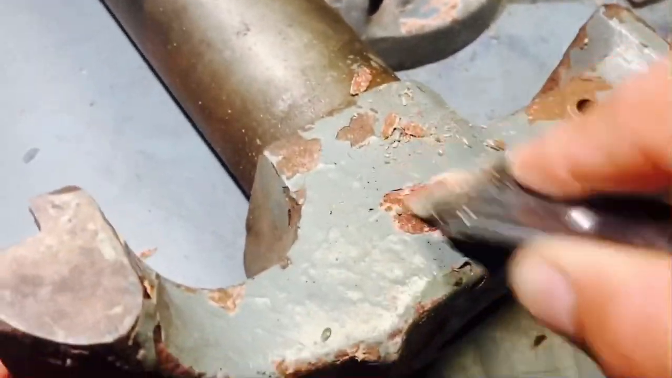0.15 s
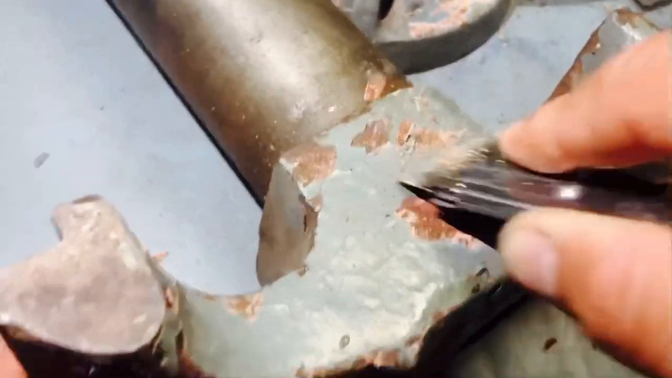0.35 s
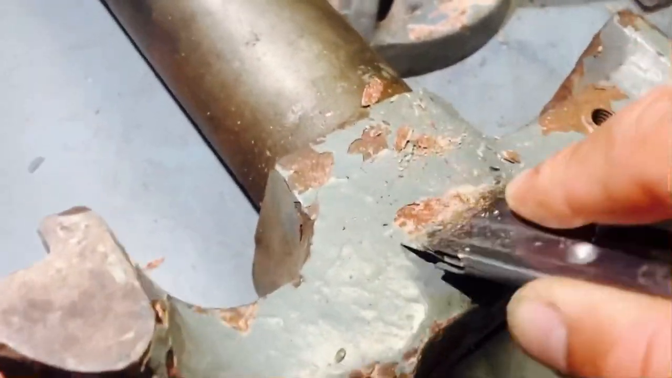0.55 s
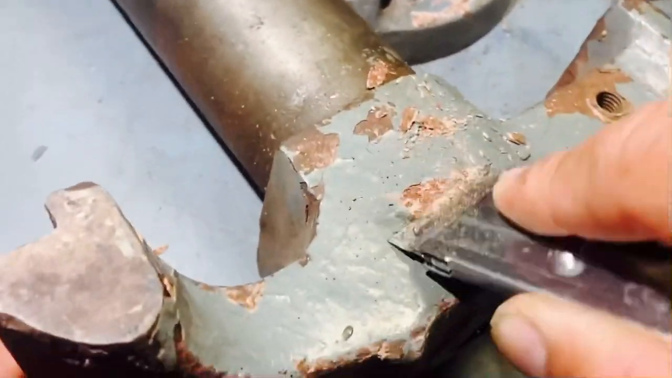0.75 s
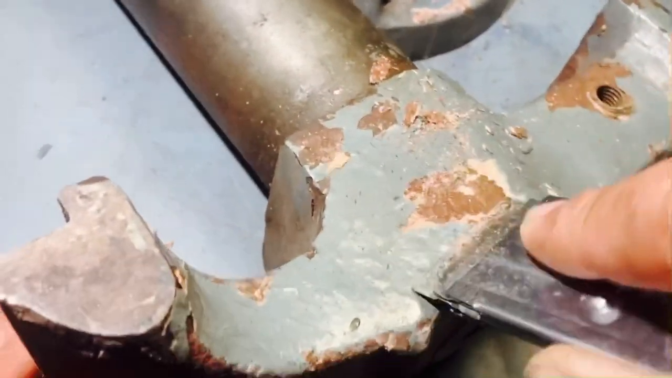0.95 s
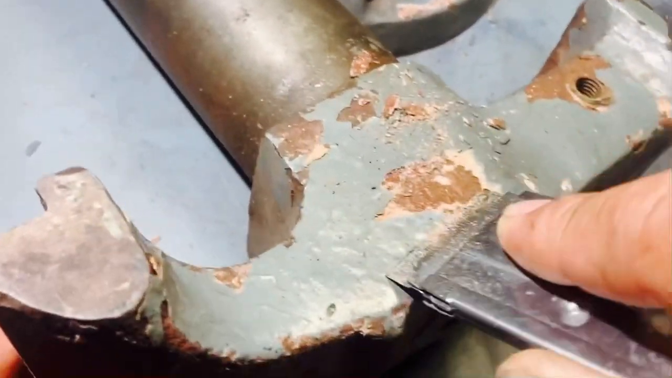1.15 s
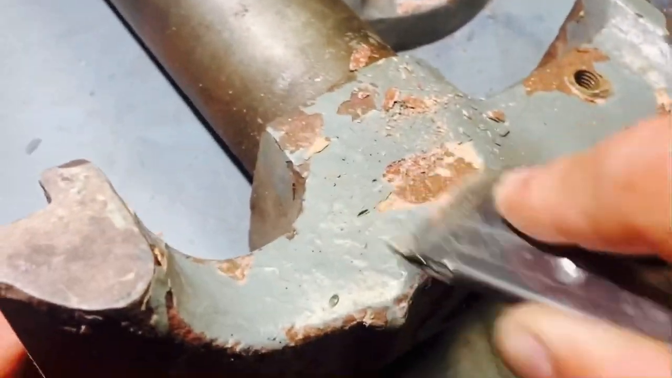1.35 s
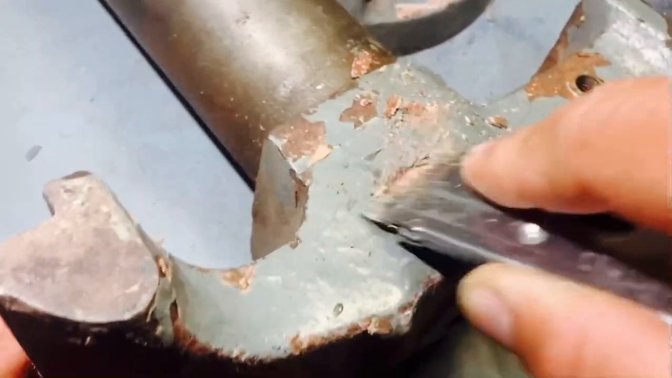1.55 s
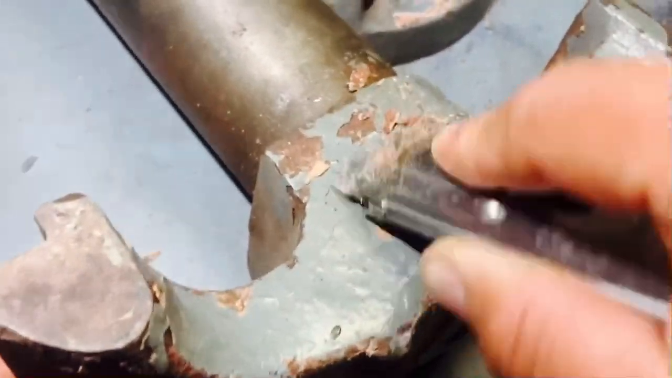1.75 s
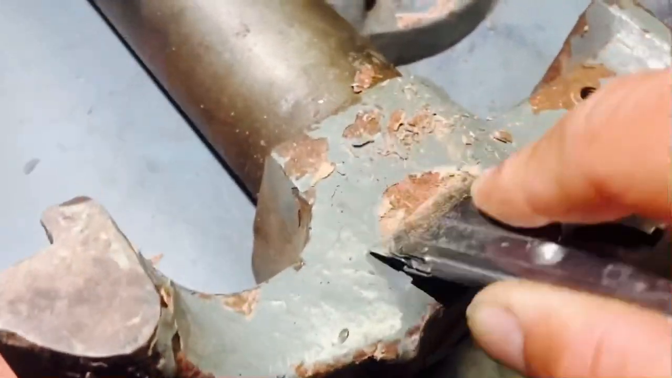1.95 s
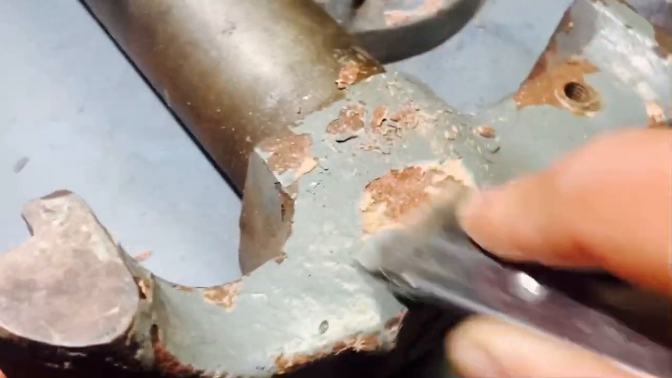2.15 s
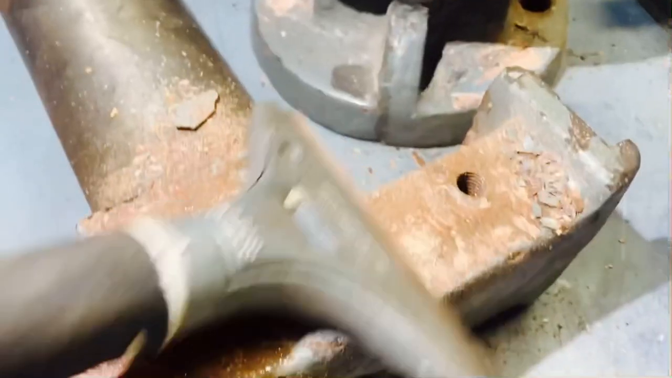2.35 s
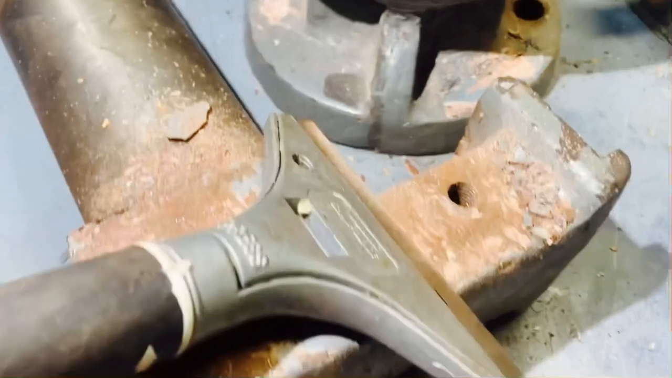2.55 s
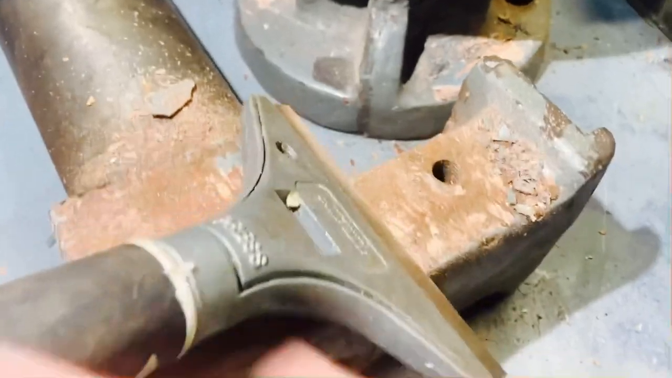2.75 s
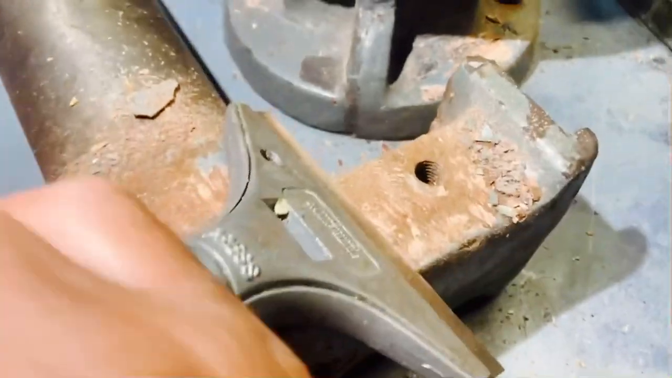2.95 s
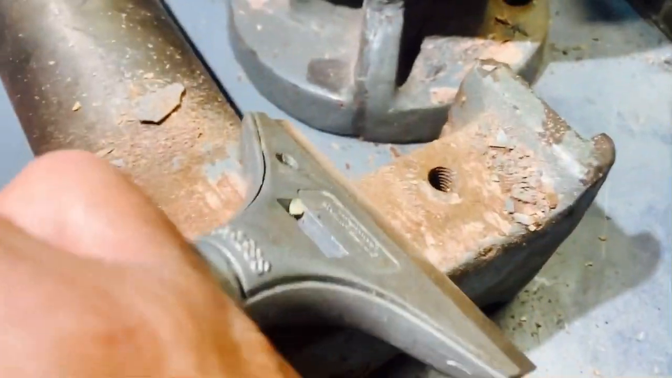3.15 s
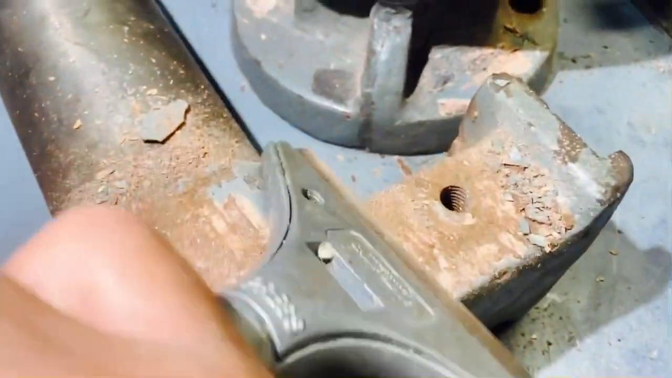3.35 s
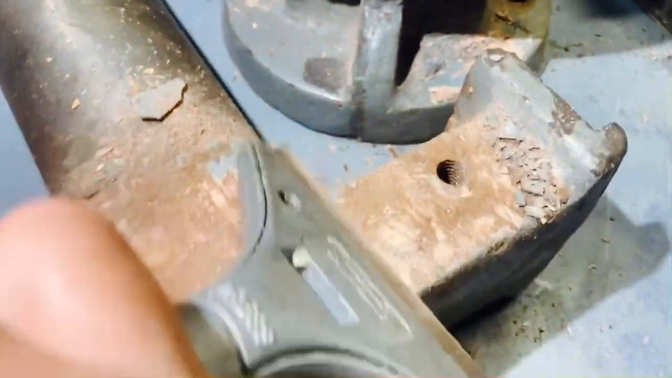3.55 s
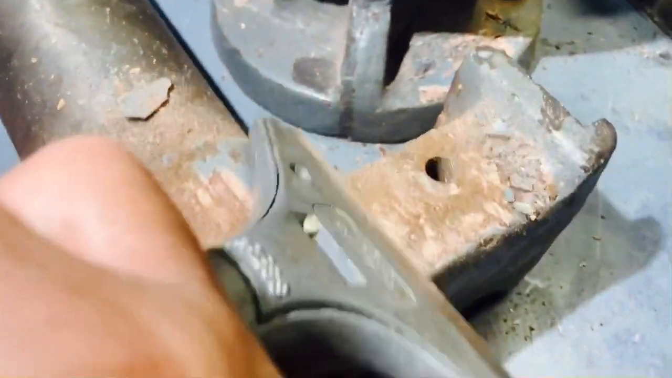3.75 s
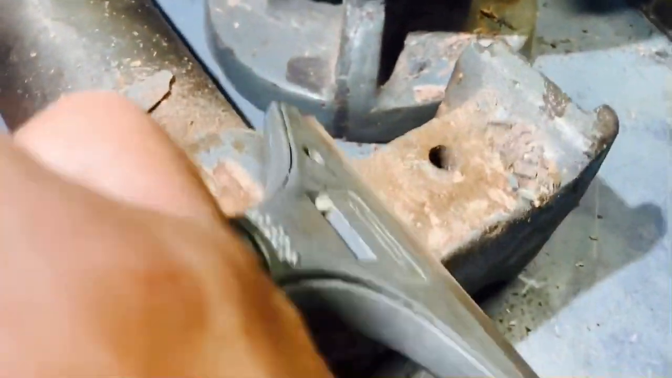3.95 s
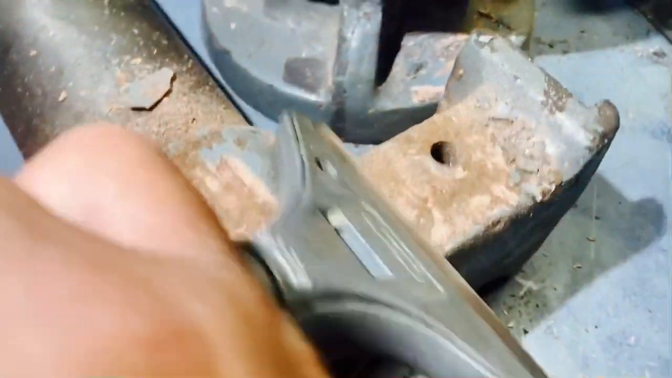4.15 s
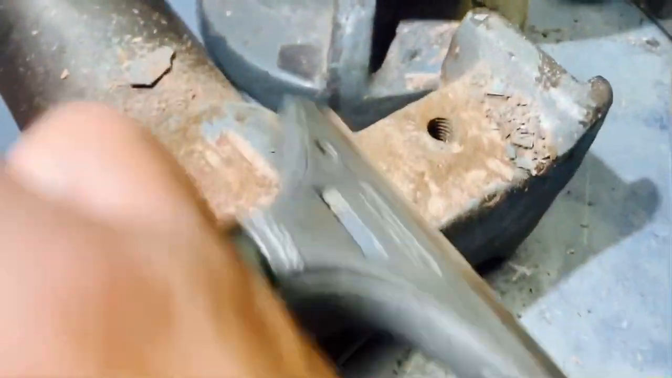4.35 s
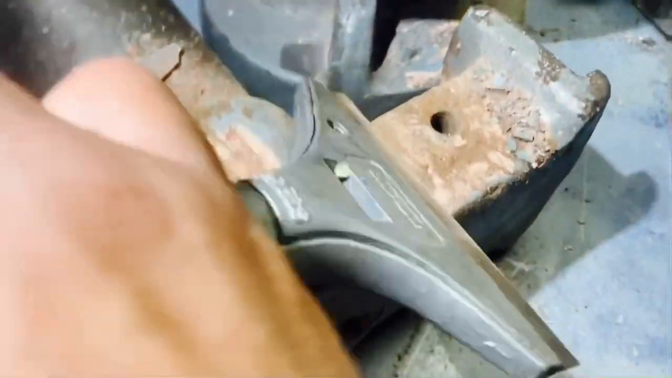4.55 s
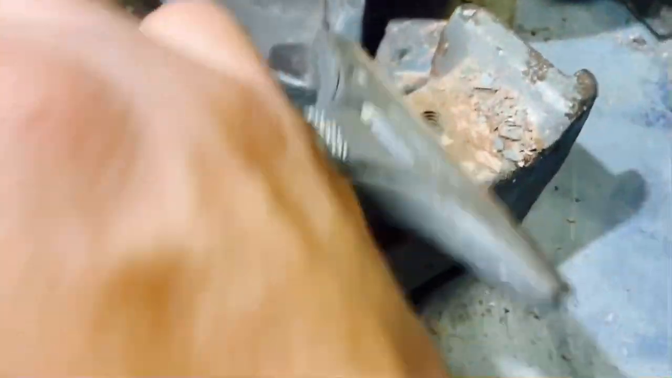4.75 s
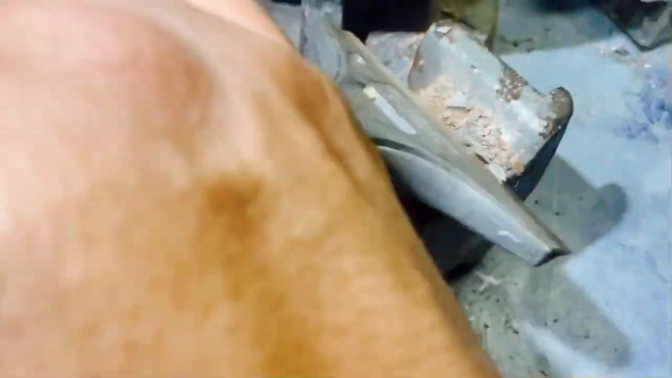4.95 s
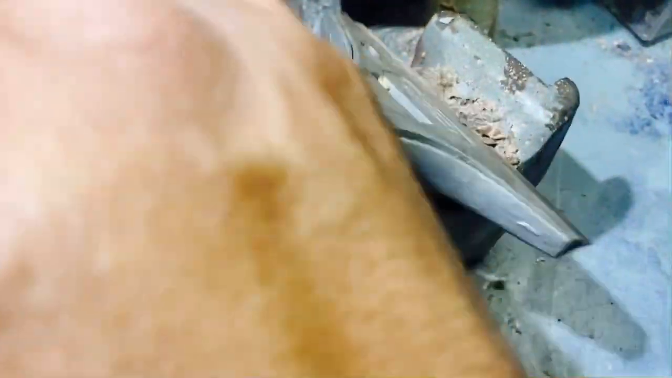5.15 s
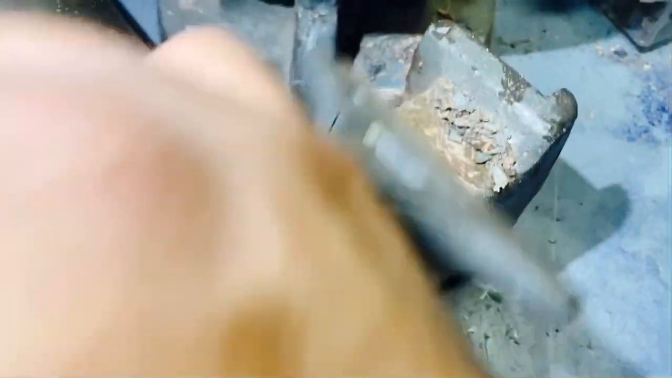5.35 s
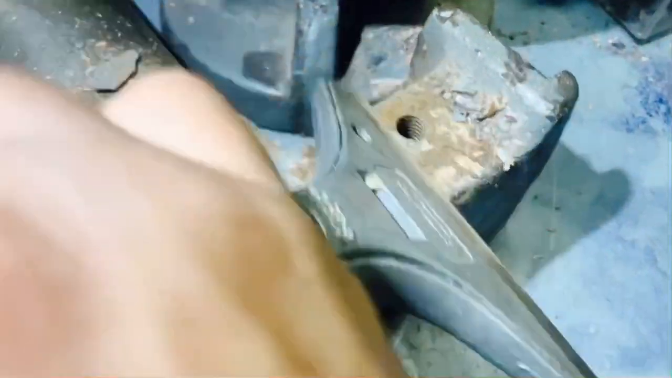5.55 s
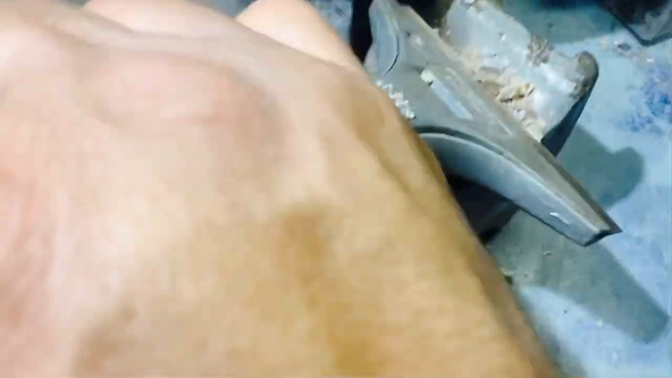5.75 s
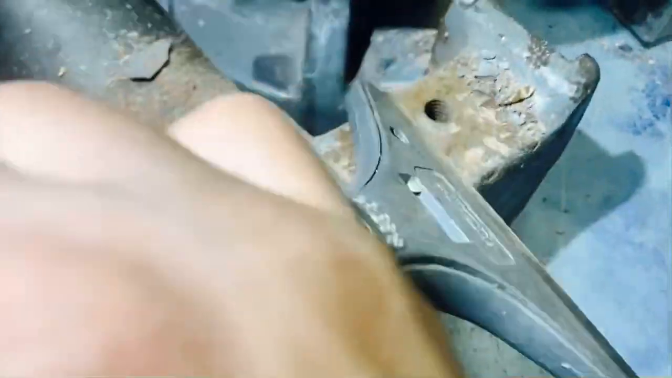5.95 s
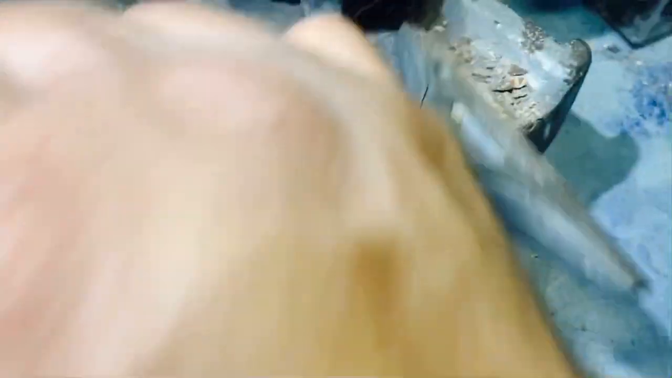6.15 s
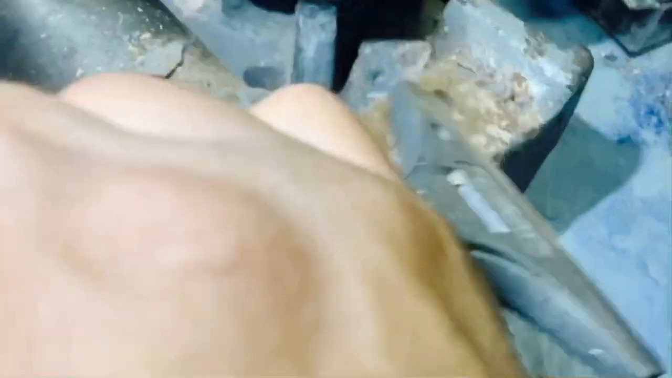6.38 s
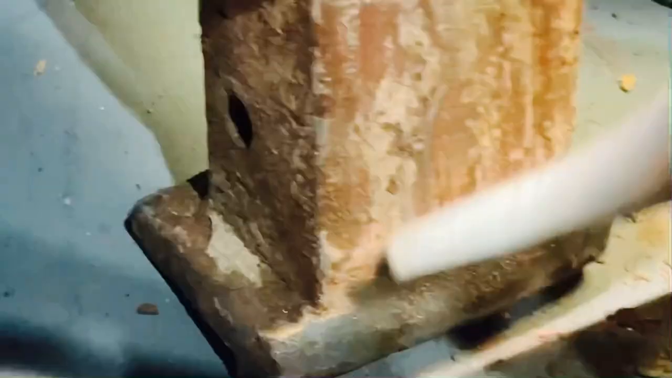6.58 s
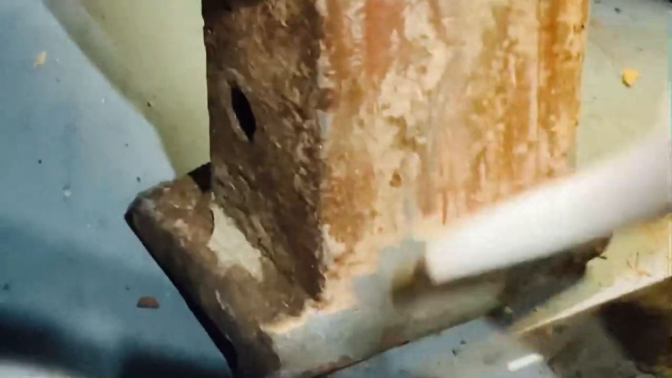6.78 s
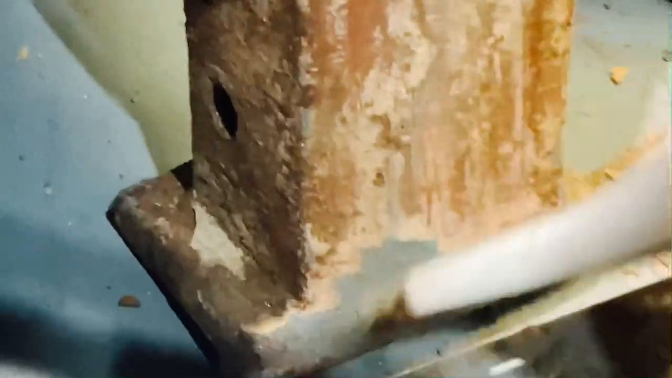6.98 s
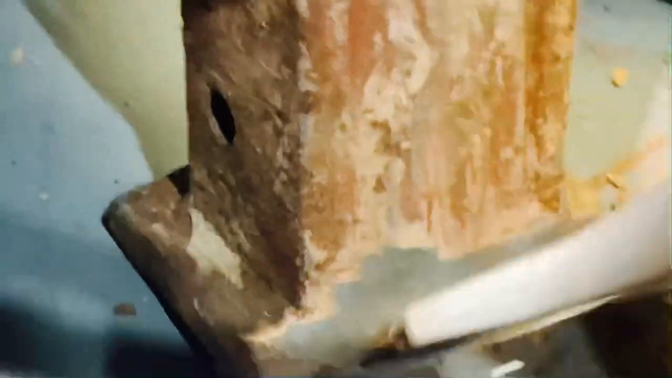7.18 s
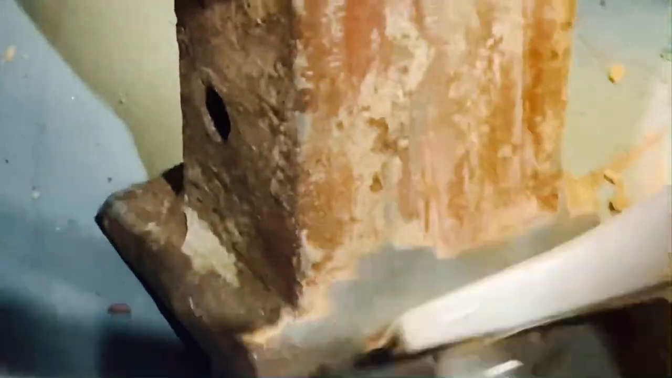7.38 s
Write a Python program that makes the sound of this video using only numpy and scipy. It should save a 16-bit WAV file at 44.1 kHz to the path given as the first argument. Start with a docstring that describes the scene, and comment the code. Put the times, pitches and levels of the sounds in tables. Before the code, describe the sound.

Quick dry scraping of rust and flaking paint off a heavy iron vise, brittle flakes snapping, then thudding knocks and a faint metallic singing.

```python
"""Rust and flaking paint are scraped off a cast-iron vise in quick strokes, heard close by in stereo.
A knife works first, then a wide scraper, later leant over, and last a rod on the upturned jaw.
Throughout, grit excites the resonances of each tool, and snapping flakes add short noise bursts.
Knocks and shaking ring the decaying modes of vise and bench, and a buzz follows each knock; from midway until
near the end the jaw sings in narrow resonances. A short diffuse tail and a workshop's noise hum lie behind."""
import sys
import numpy as np
from scipy import signal
from scipy.fft import rfft, irfft
from scipy.io import wavfile
from scipy.ndimage import uniform_filter1d

SR = 44100
rng = np.random.default_rng(int(sys.argv[2]) if len(sys.argv) > 2 else 0)


def waveform_to_disk(signal):
    """Save audio, clipped to [-1, 1], as 16-bit WAV at the path in sys.argv[1]."""
    frames = np.transpose(np.atleast_2d(signal))
    scaled = np.clip(frames, -1, 1) * 32767
    samples = np.round(scaled).astype(np.int16)
    wavfile.write(sys.argv[1], SR, samples)


N = 327222

# All levels are relative to the stage they feed.
# Strokes of the edge: bite t/s, swell/ms, ease/ms, hardest level/dB, treble over middle/dB
STROKES = [(0.0, 3.4, 14.5, -21.5, 6), (0.107, 45, 11, -27.5, 13), (0.182, 33, 27.4, -19.5, 7.5),
           (0.352, 27.4, 30, -26.5, 12.5), (0.424, 30, 35, -20, 5.5), (0.574, 22, 39, -29, 8.5),
           (0.658, 48.1, 16, -16.5, 3), (0.794, 40, 40, -25.5, 10), (0.894, 6.1, 39, -40.5, -2),
           (0.947, 18, 16, -39, 10.5), (1.147, 42, 31.5, -29, 1.5), (1.273, 40, 29, -34, 8.5),
           (1.381, 14, 54, -31.5, 0.5), (1.42, 16, 46.5, -15.5, 5), (1.542, 7.2, 53, -23.5, 11.5),
           (1.617, 43.6, 48, -20.5, 7), (1.78, 20.6, 34, -23, 10.5), (1.862, 13.7, 21, -19.5, 4),
           (1.904, 7.9, 15, -30, 6), (2.017, 16, 47, -30, 9), (2.099, 37.6, 18, -25, 3),
           (2.207, 4.2, 44, -51, -9), (2.296, 46, 31, -24.5, 7.5), (2.42, 31.2, 18.6, -18.5, 2),
           (2.598, 74, 32, -45, 5.5), (2.818, 11, 113, -43, 4.5), (2.985, 51, 16, -41, 1.5),
           (3.103, 17, 28, -50.5, -5), (3.189, 36, 40, -47, 6.5), (3.308, 24.7, 14.4, -22, 0),
           (3.458, 15.5, 46, -33.5, 1.5), (3.574, 25, 22, -24.5, -1), (3.708, 28, 48, -32.5, 6.5),
           (3.815, 25, 16.3, -22, 5.5), (3.963, 30, 35, -34.5, 8), (4.068, 23.5, 8.5, -21.5, 1),
           (4.215, 35.6, 35, -32, 8), (4.296, 40, 7, -28.5, 3), (4.362, 27, 28, -30.5, 1),
           (4.464, 14, 42, -34.5, 6.5), (4.553, 30.5, 72, -25, 0.5), (4.692, 47, 21, -31.5, 3.5),
           (4.799, 41.8, 45.4, -20.5, -3.5), (4.93, 40, 40, -28.5, -1), (5.038, 48, 20, -17.5, -3),
           (5.16, 19.6, 93, -26.5, 3), (5.303, 40.3, 31.5, -19.5, -3.5), (5.431, 33, 91, -28, 2),
           (5.561, 40.8, 22.7, -13, -2.5), (5.726, 29, 18, -40.5, 2.5), (5.769, 45, 120, -28, 6),
           (5.959, 37.3, 32, -14.5, 3.5), (6.089, 44, 18, -33, 5), (6.154, 28.5, 14, -26, 2),
           (6.217, 16.6, 28, -33.5, -3.5), (6.345, 47, 62, -26, 4.5), (6.465, 53.4, 52, -25.5, -0.5),
           (6.638, 31.7, 54, -22.5, 3.5), (6.754, 15, 29, -39, 1), (6.876, 13.3, 46.3, -22.5, 3),
           (7.08, 14.5, 51, -20.5, 4), (7.175, 27, 24, -45, 5), (7.297, 3.4, 69.6, -24.5, 2)]
# The loudest flakes snapping off: t/s, peak level/dB
SNAPS = [(0.3572, -31), (0.453, -11.5), (0.4702, -12.5), (0.593, -27), (0.432, -15.5), (0.574, -32),
         (0.6627, -28), (0.6739, -18), (0.795, -22.5), (0.898, -23.5), (1.148, -21), (1.177, -23.5),
         (1.2022, -15), (1.379, -28), (1.3928, -16.5), (1.4307, -13), (1.4437, -21), (1.4587, -16),
         (1.549, -22), (1.6808, -9.5), (1.863, -30), (1.9084, -6.5), (2.1403, -16), (2.3127, -18),
         (2.3561, -15.5), (2.422, -23.5), (2.4535, -9.5), (3.2166, -25.5), (3.3287, -10.5), (3.8404, -5.5),
         (4.0913, -16), (4.3305, -17.5), (4.4706, -26), (4.852, -16.5), (5.087, -13), (5.2184, -11),
         (5.354, -7), (5.3585, -7), (5.436, -23), (5.4756, -16), (5.586, -11), (5.593, -9), (5.7997, -10),
         (6.012, -14), (6.123, -21.5), (6.126, -15.5), (6.1828, -10.5), (6.64, -25), (6.6719, -9.5),
         (6.8789, -16), (6.892, -13), (7.0976, -13.5), (7.3006, -7.5), (7.356, -28)]
# The vise jolted against the bench: t/s, level/dB, sharpness/dB
KNOCKS = [(0.208, -22.5, -5), (0.447, -17.5, -22), (0.704, -34, -16), (1.194, -26, 0.5),
          (1.429, -16.5, -30), (1.661, -20, -13), (2.205, -20.5, -22), (2.459, -5, -5.5), (2.816, -31, -33),
          (3.049, -21, -2), (3.331, -6, -3.5), (3.607, -11.5, -3.5), (3.839, -14, 1), (4.095, -8.5, -3.5),
          (4.334, -14.5, 5.5), (4.208, -29, -26), (4.386, -18, -25), (4.572, -25, -10), (4.643, -24.5, -25),
          (5.06, -11.5, -6.5), (5.096, -4.5, -11.5), (5.362, -7, -11), (5.617, -11.5, -8.5),
          (6.014, -7.5, -7.5), (6.239, -12.5, -4.5), (6.672, -40, 8), (6.892, -21, -0.5),
          (6.999, -29.5, -3), (7.097, -38, 6.5), (7.302, -29, 0)]
# Moments when the next tool takes over: t/s
TOOL_CHANGE_S = [2.18, 6.6]
# Tool resonances: f/Hz, width/Hz, level/dB
KNIFE_RING = [(705, 112, -6), (3270, 760, -4), (3500, 200, -10), (4660, 81, -8.5), (6860, 800, -1.5),
              (11420, 600, -10.5)]
WIDE_RING = [(2350, 31, -2.5), (2700, 53, -7.5), (3100, 410, -6.5), (3923, 124, 1.5), (4310, 135, 1),
             (4640, 220, 2), (6570, 40, 2.5), (7140, 44, -7)]
ROD_RING = [(1120, 200, -10.5), (1800, 93, -6.5), (2590, 170, -9), (6740, 42, 2.5), (7300, 67, -12),
            (7770, 59, 4), (11750, 350, -10)]
# Broad spectrum of each tool's rasp: f/Hz, level/dB
KNIFE_RASP = [(300, -25.5), (1500, -13.5), (2600, -17.5), (5500, -13), (7000, -11.5), (10000, 7),
              (16000, -3)]
WIDE_RASP = [(300, -6.5), (1400, -10.5), (2800, -16), (5700, -12), (7500, 1.5), (12500, 0), (16000, -4.5)]
ROD_RASP = [(300, -12), (1400, -17), (5500, -6.5), (7500, -5), (10000, 0.5), (16000, -8.5)]
# Phase of the right channel against the left, negative for a lag: f/Hz, phase/rad
KNIFE_PHASE = [(0, 0), (1400, -2.6), (2000, -4), (2600, -3.7), (3200, -6.2), (4800, -5.6), (5300, -3.2),
               (6200, -.4)]
WIDE_PHASE = [(0, 0), (500, -.5), (1100, -2.3), (1500, -3.5), (1850, -7), (2150, -5), (3100, -4),
              (3600, -5.8), (4700, -6), (5100, -8.8), (6200, -7)]
ROD_PHASE = [(0, 0), (1200, -1.8), (2000, -7.5), (3200, -8), (3700, -9.4), (4500, -12), (5000, -9.6),
             (6200, -10)]
# Added resonances of the wide blade when leant over: f/Hz, width/Hz, level/dB
LEAN_RING = [(2082, 56, 5.1), (2553, 55, 2.6), (4020, 130, 9.7), (4703, 130, 9.8)]
# Modes of vise and bench, lying down and with the jaw upturned: f/Hz, level/dB, t60/s
BENCH = [(64.3, -14, 0.27), (95.5, -5, 0.2), (171.7, 1, 0.097), (231.3, -6, 0.15), (320, -4, 0.076),
         (532, -21, 0.055), (1037, -2.5, 0.011), (1752, -9, 0.014)]
UPTURNED = [(84.5, 4.5, 0.14), (130, 7, 0.078), (298.5, 4, 0.065), (585, -6, 0.058), (1070, 5, 0.0068),
            (1800, -7.5, 0.013)]
# The edge trailing on the metal between strokes: t/s, level/dB
TRAIL = [(0, -52), (.9, -63.5), (1.05, -82), (1.3, -47.5), (2.1, -59.5), (3, -65), (4.3, -63.5), (4.7, -47),
         (6.4, -55), (6.6, -80), (7.42, -65)]
# Thin tones of the jaw: f/Hz, width/Hz, level/dB
JAW = [(942, 12, -2.5), (1583, 7.9, 4.5), (1705, 47, -8.5)]
# Spectrum of the workshop hum: f/Hz, level/dB
SHOP = [(25, -0.5), (45, 5.5), (234, -3), (450, -17), (1400, -34.5), (4600, -33), (16000, -61.5)]

# Onset of a stroke: bite time constant, then level and time constant of the creep for each tool
BITE_S, CREEP_DB, CREEP_S = .0012, [-25, -17, -28], [.008, .012, .004]
# Swell rate at a hardest level of -23.5 dB, and its change per dB: harder strokes swell more gently
SWELL_DB_PER_MS, SWELL_CHANGE_PER_DB = 0.41, -0.0134
EASE_DB = 12  # fall from the hardest moment to the lift
CHIPS_PER_S, CHIP_DB, CHIP_SCATTER_DB = 64, 2.5, 2.5  # smaller flakes, relative to the pressure gain
LEAN_S, LEAN_DB = 4.45, -20  # the lean starts; pressure gain at which it is full
SHUDDER_DB = [-27.5, -26.5, -26]  # how hard each tool shakes the vise
JAW_DB, JAW_S = 36, [3.5, 3.7, 7.1]  # gain; the tones come in, settle, stop
ROOM_DB, ROOM_T60_S, SPREAD_DB = -23.5, 0.076, -1  # SPREAD_DB: the other stretch of edge, at right
SHOP_DB = -45  # before the output stage
SPLIT_HZ, TOP_HZ = 6150, 15800  # start of the upper treble; top of the band
TURN_HZ, IN_STEP_HZ = 4350, 7025  # span of one phase turn between channels; where they agree


def scraping():
    """Forced excitation: pressure times grit, plus snaps, drives the resonator of the tool in use."""
    press, tilt_db = pressure()
    # middle and treble share a constant power
    share = 1 / np.sqrt(1 + undb(2 * tilt_db))
    grain = squeaks(grit())
    rough = press * grain
    edge = rough + snaps(press)
    other_stretch = press * np.roll(grain, N // 2)
    drive = share * np.array([edge, edge * undb(tilt_db), other_stretch])

    t = np.arange(N) / SR
    turn = np.searchsorted(TOOL_CHANGE_S, t)
    # the harder the push, the more of the leant blade's length rings
    smooth_press = uniform_filter1d(press, size=400)
    lean = (t > LEAN_S) * np.minimum(smooth_press / undb(LEAN_DB), 1)
    tools = [(turn == 0, KNIFE_RING, KNIFE_RASP, KNIFE_PHASE),
             ((turn == 1) * (1 - lean), WIDE_RING, WIDE_RASP, WIDE_PHASE),
             ((turn == 1) * lean, WIDE_RING + LEAN_RING, WIDE_RASP, WIDE_PHASE),
             (turn == 2, ROD_RING, ROD_RASP, ROD_PHASE)]
    rasp = sum(tool(*(drive * on), *parts) for on, *parts in tools)
    return rasp, share * rough * undb(SHUDDER_DB)[turn]


def pressure(fall_s=0.004, crumbs_db=-13, crumbs_s=0.034):
    """Contact force as amplitude envelope: creep, bite, swell, ease and lift; with treble tilt in dB."""
    t = np.arange(N) / SR
    press = undb(np.interp(t, *np.transpose(TRAIL)))
    for bite, swell_ms, ease_ms, db, _ in STROKES:
        k = np.searchsorted(TOOL_CHANGE_S, bite)
        hard = bite + swell_ms / 1000
        lift = bite + (swell_ms + ease_ms) / 1000
        swell_db = swell_ms * max(SWELL_DB_PER_MS + SWELL_CHANGE_PER_DB * (db + 23.5), 0)
        i = slice(max(int((bite - .08) * SR), 0), int((lift + .3) * SR))
        gain = undb(np.interp(t[i], [bite, hard, lift], [db - swell_db, db, db - EASE_DB]))
        before = np.minimum(t[i] - bite, 0)
        after = np.maximum(t[i] - lift, 0)
        creep = undb(CREEP_DB[k]) * np.exp(before / CREEP_S[k])
        attack = np.maximum(np.exp(before / BITE_S), creep)
        # once the edge lifts, loose crumbs trickle on more softly
        crumbs = undb(crumbs_db) * np.exp(-after / crumbs_s)
        release = np.maximum(np.exp(-after / fall_s), crumbs)
        press[i] += gain * attack * release
    rows = np.array(STROKES)
    # each tilt takes over 5 ms ahead of its bite
    stroke = np.maximum(np.searchsorted(rows[:, 0], t + .005) - 1, 0)
    return press, rows[stroke, -1]


def grit(per_s=2200, scatter_db=3, slip_db=1.0, hiss_db=-3, patchy_db=4.5, lumps_per_s=45):
    """Stick-slip friction as uneven random impulses over hiss; lumps of rust vary the level band by band."""
    size_db = scatter_db * np.minimum(rng.exponential(size=N), 3.5)
    clicks = (rng.random(N) < per_s / SR) * rng.standard_normal(N) * undb(size_db)
    hiss = undb(hiss_db) * rng.standard_normal(N)
    spectrum = rfft((level(clicks) + hiss) * undb(slip_db * walk(250)))
    # overlapping triangular bands, spaced evenly in log frequency at the top
    place = 6 * np.log2(hertz() / 700 + 1)
    lumps = 0
    for k in range(29):
        band = irfft(spectrum * np.maximum(1 - abs(place - k), 0), N)
        lumps = lumps + band * undb(patchy_db * walk(lumps_per_s))
    return level(lumps)


def squeaks(grain, squeak_db=6, per_s=45, width_hz=90, count=13):
    """Narrow resonance under friction: chips caught by the edge sing briefly, each at its own pitch."""
    pitches = np.geomspace(1900, 8500, count) * (1 + .03 * rng.standard_normal(count))
    singing = 0
    for hz in pitches:
        caught = np.clip(walk(per_s) - .7, 0, 1)
        singing = singing + peak(grain, hz, width_hz) * caught
    return level(grain + undb(squeak_db) * singing)


def snaps(press, rise_s=0.00026, decay_s=0.0023):
    """Brittle fracture as millisecond bursts of random sign: big flakes, and chips sized by the pressure."""
    t = np.arange(900) / SR
    crack = (1 - np.exp(-t / rise_s)) * np.exp(-t / decay_s)
    chip_size = press * undb(CHIP_DB + CHIP_SCATTER_DB * rng.standard_normal(N))
    chips = (rng.random(N) < CHIPS_PER_S / SR) * chip_size
    blows = strike(*np.transpose(SNAPS)) + chips
    return rng.choice([-1, 1], N) * signal.fftconvolve(blows, crack / crack.max())[:N]


def tool(middle, treble, other, modes, rasp, phase):
    """Linear resonator: second-order modes over a broad rasp spectrum, in two channels."""
    f = hertz()
    body = colour(rasp)
    for hz, width, db in modes:
        body = body + undb(db) * 1j * f * width / (hz ** 2 - f ** 2 + 1j * f * width)
    # both halves are brought to equal power within the band
    band = (f > 1500) & (f < TOP_HZ)
    low, high = (body * part / np.sqrt(np.mean(abs(body * part)[band] ** 2) * band.mean())
                 for part in (1 - upper(), upper()))
    turn = np.exp(1j * np.interp(f, *np.transpose(phase)))
    # the right side hears the middle weaker, and partly from another stretch of the edge
    dull = colour([(400, -5.0), (1000, -12.5), (3000, -8), (6000, -7.0)])
    middle, treble, other = rfft([middle, treble, other])
    right = middle * dull * turn + other * undb(SPREAD_DB)
    return irfft(low * np.array([middle, right]) + high * treble, N)


def vise(shake, detune=0.04, scatter_db=2.5):
    """Modal superposition: knocks and stroke shake ring vise and bench; sharp knocks favour upper modes."""
    late = np.arange(N) / SR > TOOL_CHANGE_S[1]
    jolts = signal.lfilter([1, -1], [1, -.98], shake)
    out = np.zeros(N)
    for modes, on in ((BENCH, ~late), (UPTURNED, late)):
        out += signal.fftconvolve(on * jolts, ring(modes))[:N]
    chances = rng.standard_normal((len(KNOCKS), 2, len(BENCH)))
    for (s, db, sharp_db), chance in zip(KNOCKS, chances):
        modes = UPTURNED if s > TOOL_CHANGE_S[1] else BENCH
        # the grip on the vise changes, so no two knocks ring quite alike
        struck = []
        for (hz, mode_db, t60), a, b in zip(modes, *chance):
            tone_db = sharp_db + 10.5 if hz > 400 else -5
            struck.append((hz * (1 + detune * a), db + mode_db + scatter_db * b + tone_db, t60))
        add(out, s, ring(struck))
        add(out, s, undb(db - 12.5) * flex(sharp_db))
    lag = np.exp(1j * np.interp(hertz(), *np.transpose(WIDE_PHASE)))
    return np.array([out, shape(out, lag * colour([(400, -1.5), (1000, -3.5), (1800, -8.5)]))])


def ring(modes, late_cycles=1.58):
    """Modal decay: damped sines; the lower a mode, the later it swings up."""
    t = np.arange(SR // 3) / SR
    out = 0
    for hz, db, t60 in modes:
        swing_up = 1 - np.exp(-(t * hz / late_cycles) ** 2)
        out = out + undb(db) * np.sin(2 * np.pi * hz * t) * swing_up * np.exp(-np.log(1000) * t / t60)
    return out


def flex(sharp_db, spread=9, decay_s=0.0042):
    """Dispersion of bending waves in the bench top: highs arrive first, lows trail."""
    t = np.arange(1, SR // 20) / SR
    sweep = np.sin(spread * np.log(1 + t / 0.0017))
    sharp_start = 1 + undb(sharp_db + 14.5) * np.exp(-t / 0.00072)
    return sweep * np.exp(-t / decay_s) * sharp_start


def jaw(rough, first_db=5):
    """Driven resonance: the drag of wide blade and then rod rings thin tones of the jaw, most at first."""
    t = np.arange(N) / SR
    start, settle, stop = JAW_S
    on = (t > start) * (t < stop) * np.where(t < settle, undb(first_db), 1)
    return undb(JAW_DB) * sum(undb(db) * peak(on * rough, hz, width) for hz, width, db in JAW)


def rattle(rattle_db=-20, decay_s=0.053, centre_hz=900, width_hz=1400):
    """Repeated loose contact as decaying band-passed noise: jaw and crumbs buzz after each knock."""
    s, db, sharp_db = np.transpose(KNOCKS)
    decay = np.exp(-np.arange(SR // 4) / SR / decay_s)
    buzz = signal.fftconvolve(strike(s, db + .5 * sharp_db + rattle_db), decay)[:N]
    return peak(buzz * rng.standard_normal((2, N)), centre_hz, width_hz)


def room(dry):
    """Diffuse reverberation: decaying noise, different on each side and thin in the bass."""
    t = np.arange(SR // 3) / SR
    tail = rng.standard_normal((2, len(t))) * np.exp(-np.log(1000) * t / ROOM_T60_S) * (t > .004)
    tail = signal.lfilter([1, -1], [1, -.9], tail)
    tail = tail / np.sqrt(np.sum(tail ** 2, axis=1, keepdims=True))
    return undb(ROOM_DB) * signal.fftconvolve(dry, tail, axes=1)[:, :N]


def shop():
    """Partly coherent ambient noise: a wavering low hum as a sum and difference of two noises."""
    mid, side = (shape(rng.standard_normal(N), colour(SHOP)) * undb(3 * walk(5)) for _ in range(2))
    side = shape(side, colour([(40, -3), (200, -10), (1000, -2)]))
    return level(mid + side * np.array([[1], [-1]]), SHOP_DB)


def undb(db):
    """Amplitude ratio from its logarithmic level in dB."""
    return 10 ** (np.asarray(db) / 20)


def level(x, db=0):
    """Normalisation to a root-mean-square level in dB."""
    return x * undb(db) / np.sqrt(np.mean(x ** 2))


def hertz():
    """Frequencies of the discrete spectrum, in Hz."""
    return np.arange(N // 2 + 1) * SR / N


def shape(x, gain):
    """Linear filtering by a complex gain for each frequency."""
    return irfft(rfft(x) * gain, N)


def colour(points):
    """Spectral envelope: gain from f/Hz, level/dB points joined on a log axis."""
    hz, db = np.transpose(points)
    return undb(np.interp(np.log(hertz() + 1), np.log(hz), db))


def upper():
    """Crossover: share of each frequency that lies in the upper treble."""
    return 1 / (1 + (SPLIT_HZ / (hertz() + 1)) ** 40)


def peak(x, hz, width_hz):
    """Single resonance of given centre and bandwidth."""
    return signal.lfilter(*signal.iirpeak(hz, hz / width_hz, fs=SR), x)


def walk(rate):
    """Slow random modulation: straight glides between random levels, about `rate` a second."""
    k = max(int(SR / rate), 2)
    steps = np.repeat(rng.standard_normal(N // k + 1), k)
    return 1.45 * uniform_filter1d(steps, k)[:N]


def strike(seconds, db):
    """Impulsive excitation: single-sample blows."""
    x = np.zeros(N)
    x[(np.asarray(seconds) * SR).astype(int)] = undb(db)
    return x


def add(out, seconds, x):
    """Superposition: mix x into out from a given time."""
    part = out[int(seconds * SR):][:len(x)]
    part += x[:len(part)]


def scene():
    """Superposition of scraping, vise, room and workshop."""
    rasp, shake = scraping()
    jaw_pair = jaw(shake) * undb([[0], [-5]])  # left, right
    body = vise(shake) + jaw_pair + rattle()
    return rasp + body + room(rasp + undb(-10) * body) + shop()


def record(dry):
    """Saturation and band limits; one upper treble serves both channels, earlier by 1 / TURN_HZ at right."""
    dry = np.tanh(0.71 * dry) / 0.93
    turn = np.exp(2j * np.pi * (hertz() - IN_STEP_HZ) / TURN_HZ)
    right = shape(dry[1], 1 - upper()) + shape(dry[0], upper() * turn)
    pair = np.array([dry[0], right])
    pair = signal.sosfilt(signal.butter(2, 42, "high", fs=SR, output="sos"), pair)
    return signal.sosfilt(signal.ellip(12, .2, 85, TOP_HZ, fs=SR, output="sos"), pair)


dry = scene()
out = record(dry)
waveform_to_disk(out)
```